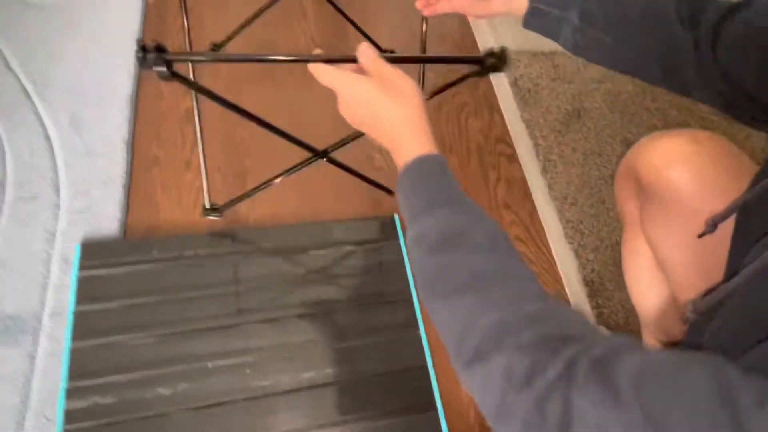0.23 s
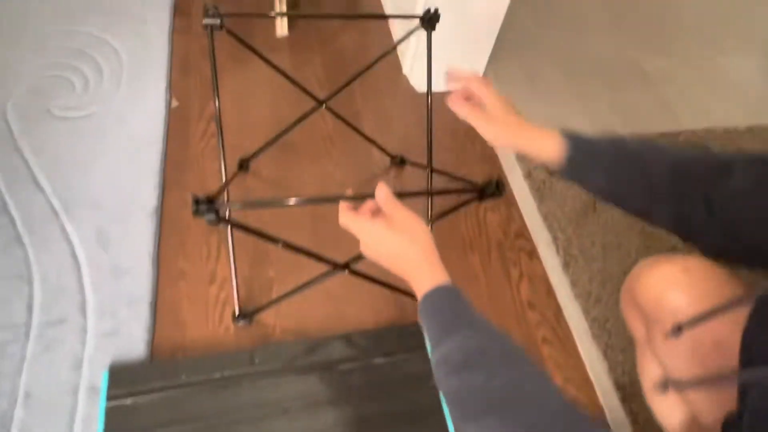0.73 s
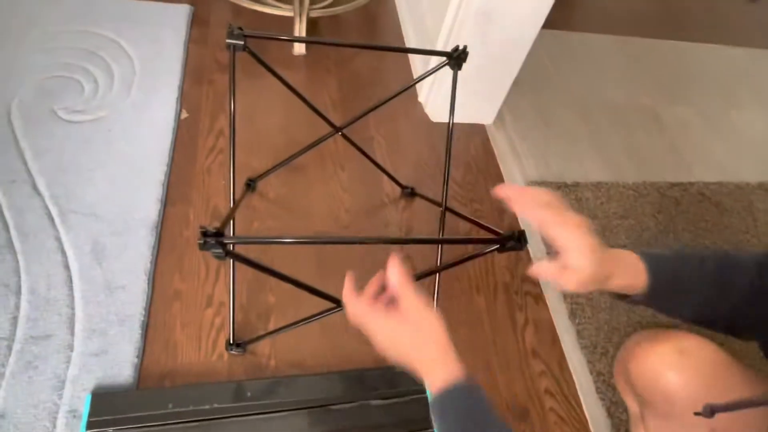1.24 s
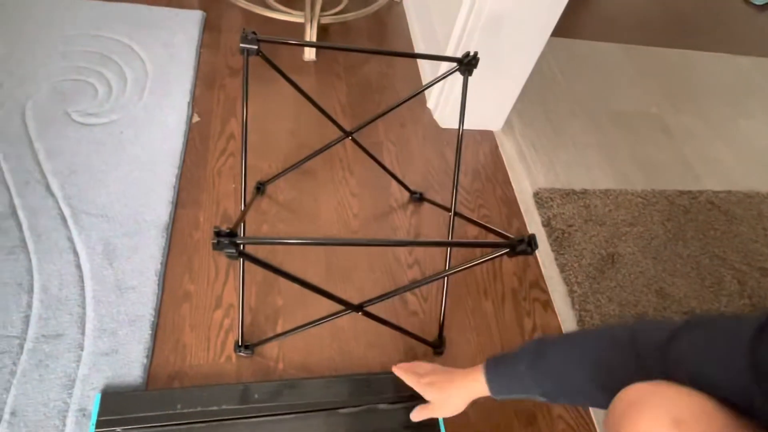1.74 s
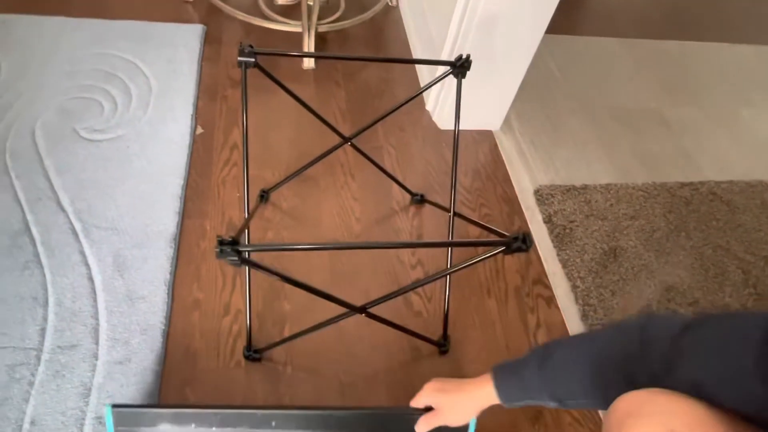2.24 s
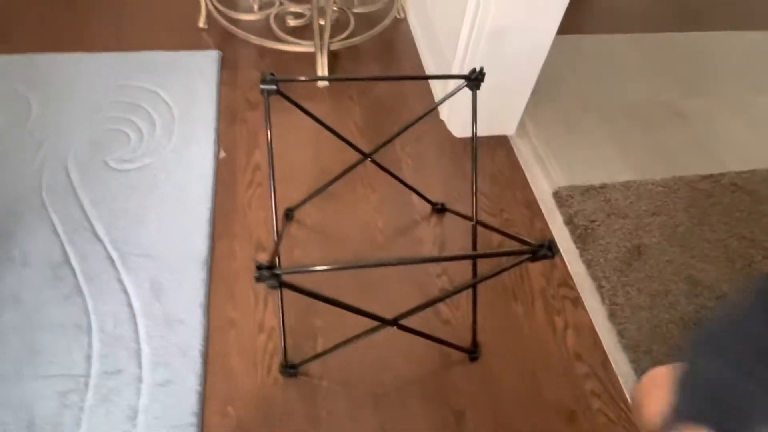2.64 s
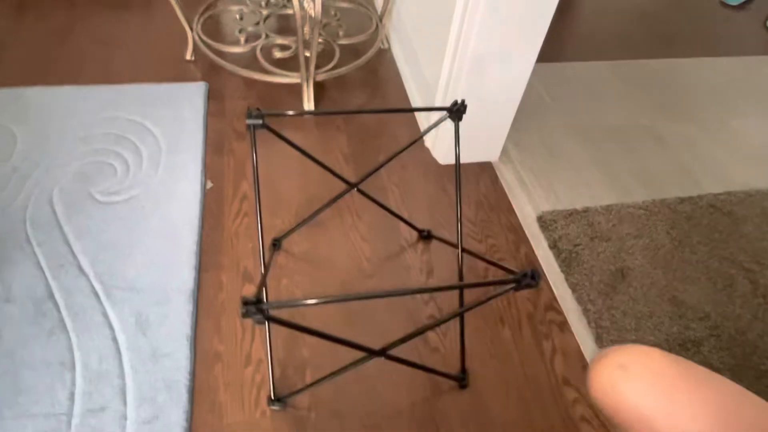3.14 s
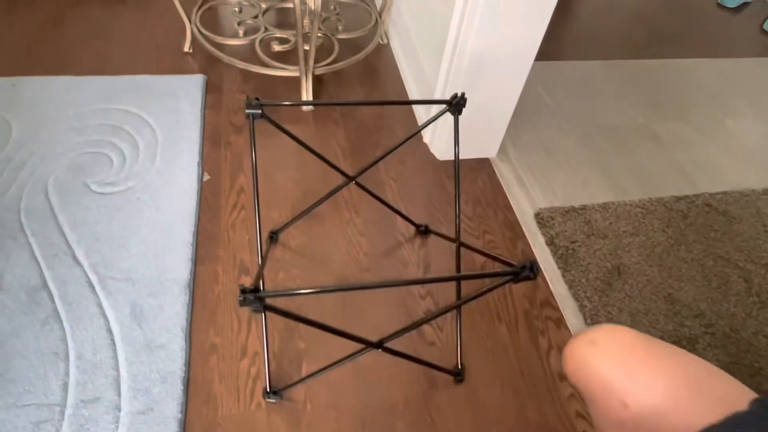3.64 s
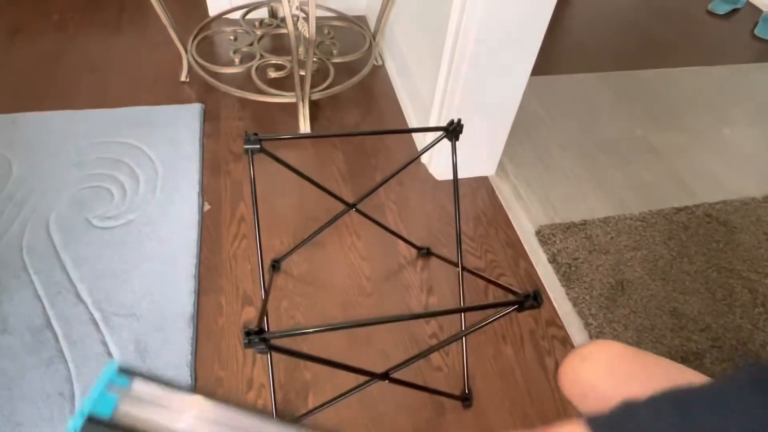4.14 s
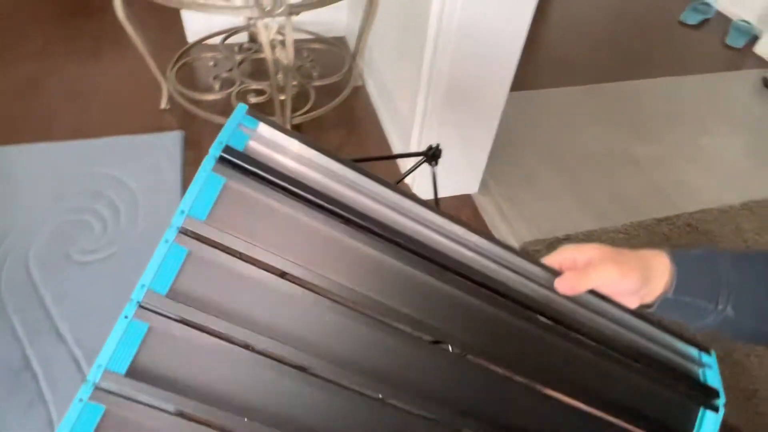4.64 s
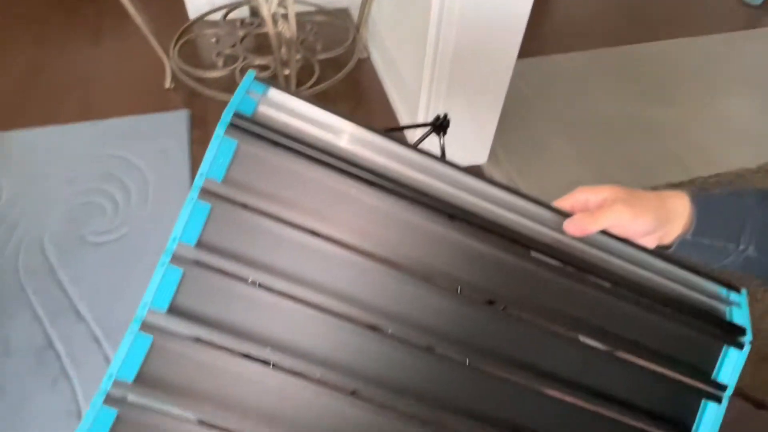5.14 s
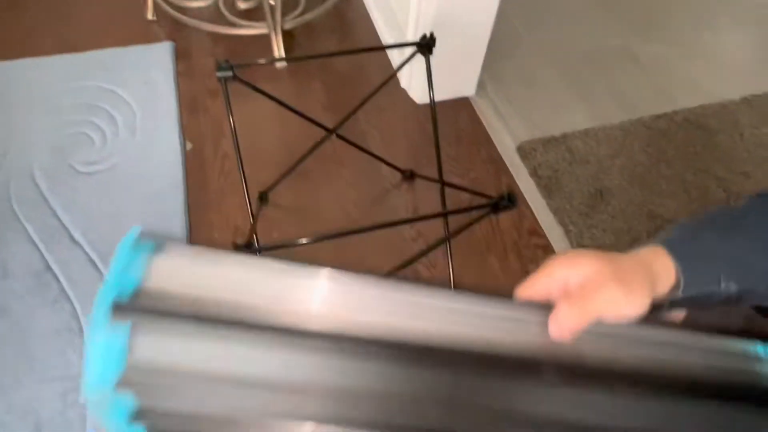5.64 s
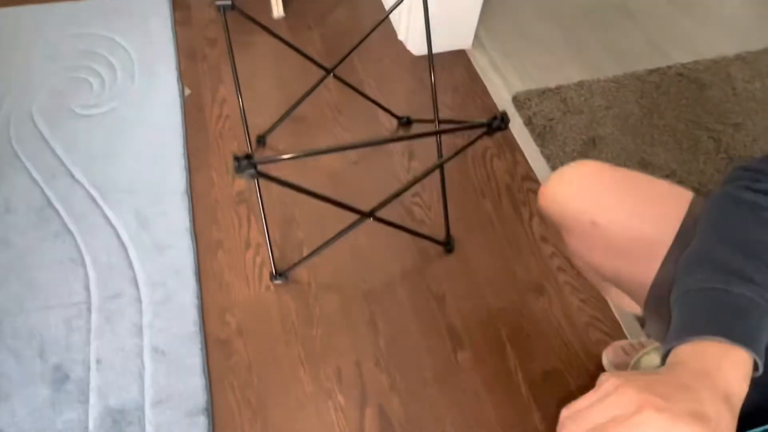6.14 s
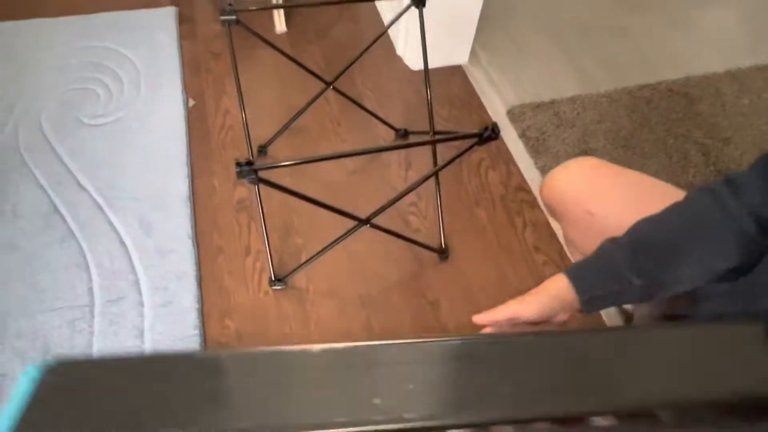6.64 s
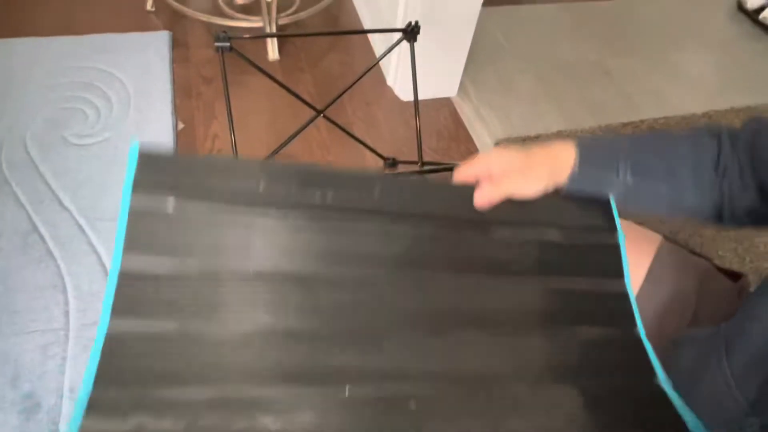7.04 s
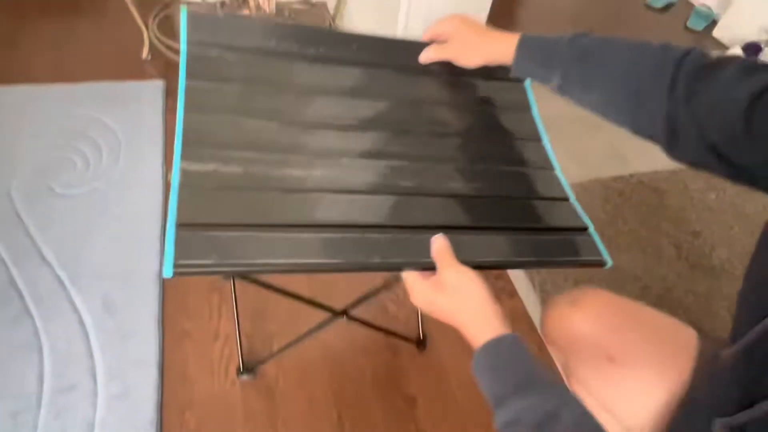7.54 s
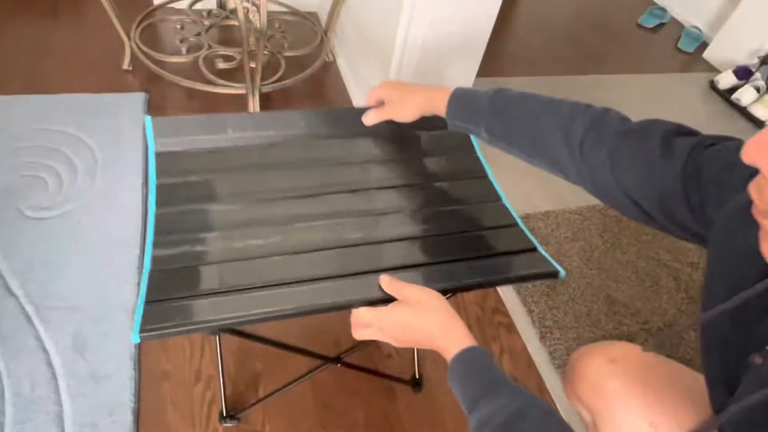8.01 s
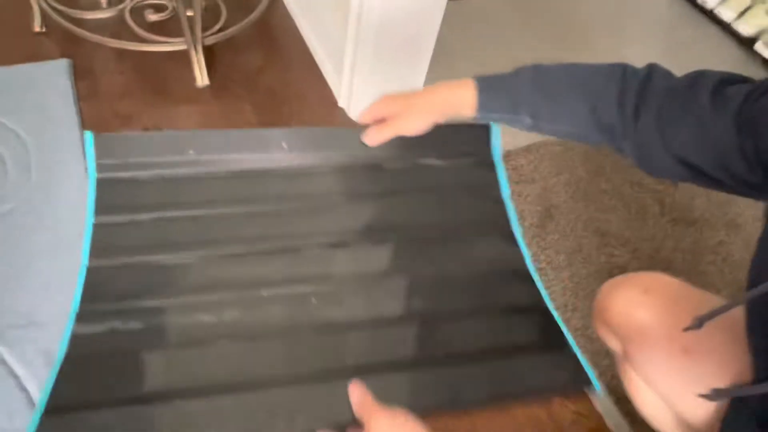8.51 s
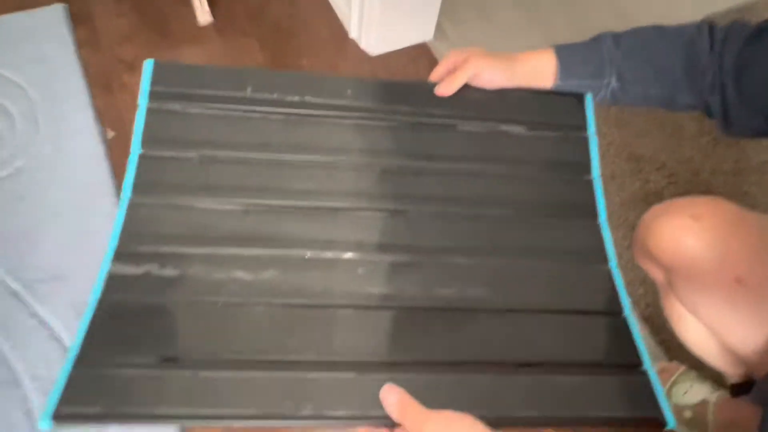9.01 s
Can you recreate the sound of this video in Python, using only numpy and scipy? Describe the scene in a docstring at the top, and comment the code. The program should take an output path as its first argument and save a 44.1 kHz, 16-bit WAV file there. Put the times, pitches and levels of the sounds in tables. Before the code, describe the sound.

In a small hard-floored room, heard close up, a folding metal frame lands with a sharp ringing knock and a few weaker taps. Hollow slats then clatter off the boards, tick and rustle sparsely in the hands with soft floor bumps, rattle more as they are flipped, and finally bang and clack repeatedly against the frame, with low flexing thumps beneath.

```python
"""A thin steel table frame is set down on a wooden floor: each blow is noise bursts plus ringing frame modes.
Then a roll-up top of hollow metal slats is picked up with a clatter, turned over and tried on the frame:
blows and streams of small contacts ring slat modes, filtered noise rustles and ticks, wavering sines sound
as single slat notes, and near the end two very short bright pings make one hard snap. Soft bumps come through
the floor as short low swings. A decaying noise tail gives the small room; room tone runs throughout."""
import sys
import numpy as np
from scipy import signal
from scipy.fft import rfft, irfft, next_fast_len
from scipy.io import wavfile

SR = 44100
rng = np.random.default_rng(int(sys.argv[2]) if len(sys.argv) > 2 else 0)


def store_wav(level_fs):
    """Save 16-bit WAV to argv[1]."""
    pcm = np.round(np.clip(np.atleast_2d(level_fs), -1, 1) * 32767)
    wavfile.write(sys.argv[1], SR, pcm.T.astype(np.int16))


N = 408807
TIME_S = np.arange(N) / SR
SIDES = np.array([[1], [-1]])   # left, right
PICKED_UP_S, LIFTED_S, CLEAR_S = 1.7, 2.04, 2.2   # top touched, off the boards, done clattering off them
SNAP_HZ = 3180   # a hard edge adds a snap and, above it, a tick


def from_db(db):
    """Decibels to gain."""
    return 10 ** (np.asarray(db) / 20)


def pan(left_right_db):
    """Left and right gains from a level difference."""
    return from_db(0.5 * SIDES * left_right_db)


def rms_one(x):
    """Scale to unit power."""
    return x / np.sqrt(np.mean(x ** 2) + 1e-20)


def at_hz(points, hz):
    """Read a table on a log-frequency axis."""
    points = np.array(points)
    return np.interp(np.log(hz), np.log(points[:, 0]), points[:, 1])


def band(x, low_hz, high_hz):
    """Band-pass."""
    return signal.sosfilt(signal.butter(2, [low_hz, high_hz], "band", fs=SR, output="sos"), x)


def drift(rate_hz, s):
    """Slow chance, spread 1, read at times s."""
    steps = rng.standard_normal(int(N / SR * rate_hz) + 3)
    return np.interp(s * rate_hz, np.arange(len(steps)), steps)


# likeness of the two ears: hz, correlation (1)
EAR_LIKENESS = [(60, 0.84), (180, 0.3), (550, 0.066), (1650, 0.059), (4970, 0.017), (15000, 0.13)]


def stereo_noise(spectrum):
    """Noise of a given colour, alike in both ears in the bass, looser above; rms 1."""
    size = next_fast_len(N)
    hz = np.maximum(np.fft.rfftfreq(size, 1 / SR), 1)
    alike = np.clip(at_hz(EAR_LIKENESS, hz), -1, 1)
    mid, side = rfft(rng.standard_normal((2, size)))
    both = np.sqrt(1 + alike) * mid + np.sqrt(1 - alike) * side * SIDES
    return rms_one(irfft(both * from_db(at_hz(spectrum, hz)), size)[:, :N])


# room tone colour: hz, density_db (per Hz, relative)
AIR_SPECTRUM = [(25, 0), (58, -5), (140, -22.5), (177, -11), (250, -28), (300, -25.5), (966, -30),
                (14000, -52)]
AIR_DB = -64


def room_tone():
    """Bass-heavy noise whose level wavers slightly."""
    level_db = AIR_DB + 0.59 * drift(4.9, TIME_S)
    return from_db(level_db) * stereo_noise(AIR_SPECTRUM)


# decay of the room: hz, t60_s
ROOM_DECAY = [(150, 0.34), (600, 0.6), (2000, 0.29), (5000, 0.29), (11000, 0.23)]
ROOM_DB = -9.5


def room(x):
    """Diffuse tail: noise dying at its own rate in each octave; the ears share the long waves."""
    t, edges_hz = np.arange(SR) / SR, 60 * 2. ** np.arange(9)
    noise = rng.standard_normal((3, SR))
    shared, own = noise[0], noise[1:]
    tail = np.zeros((2, SR))
    for low_hz, high_hz in zip(edges_hz, edges_hz[1:]):
        share, apart = 500 / high_hz, high_hz / 500
        octave = band(shared * share + own * apart, low_hz, high_hz) / (share + apart)
        tail += octave * from_db(-60 * t / at_hz(ROOM_DECAY, np.sqrt(low_hz * high_hz)))
    tail *= 1 - np.exp(-t / 0.0056)   # first walls answer after a few ms
    tail /= np.sqrt(np.sum(tail ** 2, axis=1, keepdims=True))
    return signal.fftconvolve(x, tail, axes=1)[:, :N]


# soft bumps of hands and knees through the floor: start_s, level_db, pitch_hz
FLOOR_BUMPS = [(0.578, -42.5, 64), (0.932, -42, 91.6), (3.1, -53, 47.2), (3.501, -38, 83.7),
               (3.617, -47.5, 69.4), (3.983, -45.5, 84.2), (3.996, -33.5, 190), (5.887, -48, 109),
               (6.865, -28.5, 170.3), (6.955, -32.5, 164), (6.997, -42, 66), (7.012, -39, 203),
               (7.202, -48, 127), (8.001, -54, 133), (8.852, -36, 130), (9.031, -33, 124)]


def bumps():
    """A soft push sets the floor boards swinging for a few cycles."""
    t, out = np.arange(SR // 2) / SR, np.zeros(N)
    for start_s, level_db, pitch_hz in FLOOR_BUMPS:
        shape = from_db(level_db - 60 * t / 0.13) * (1 - np.exp(-t / 0.0032))
        swing = shape * np.sin(2 * np.pi * pitch_hz * t)
        at = round(start_s * SR)
        out[at:at + len(t)] += swing[:N - at]
    return out


# moves of the hands: reached_s (full motion), held_s, rattle_db, rattle_hz, rub_db, flex_db
# (levels relative, before each source's gain)
HAND_MOVES = [(0.02, 0.23, -82, 1050, -83.5, -74.5), (0.568, 0.018, -42, 1877, -59, -63),
              (1.09, 0.2, -76, 985, -89, -62), (1.408, 0.019, -81, 970, -78, -70.5),
              (1.74, 0.17, -56.5, 1020, -73, -68), (1.929, 0.095, -32, 956, -56, -63),
              (2.299, 0.29, -59, 1106, -67, -67.5), (2.71, 0.017, -58, 1740, -69, -96.5),
              (2.8, 0.021, -66.5, 1490, -75, -55), (2.93, 0.023, -60, 1500, -62, -57),
              (3.07, 0.0053, -67.5, 1500, -68.5, -55.5), (3.289, 0.0092, -62, 1500, -68, -58.5),
              (3.359, 0.01, -55.5, 2160, -59, -77.5), (3.621, 0.096, -71.5, 1710, -71.5, -72.5),
              (4.007, 0.029, -60, 1580, -61, -59.5), (4.16, 0.13, -67, 1580, -72.5, -65.5),
              (4.528, 0.023, -71, 2300, -69.5, -84), (5.28, 0.17, -85, 1554, -72.5, -78.5),
              (5.561, 0.021, -66, 800, -73, -64.5), (5.66, 0.11, -73.5, 1550, -75.5, -67),
              (5.862, 0.13, -57.5, 1500, -63.5, -55.5), (6.04, 0.18, -55, 1500, -64, -76),
              (6.299, 0.034, -56.5, 1450, -68.5, -62), (6.459, 0.0087, -63, 1480, -71.5, -87.5),
              (6.662, 0.2, -63.5, 1480, -72, -91), (6.86, 0.044, -50, 1400, -61, -59),
              (6.98, 0.16, -54.5, 1480, -61.5, -60), (7.25, 0.21, -62, 1540, -75.5, -62),
              (7.498, 0.13, -73, 1550, -78.5, -69), (7.8, 0.12, -51, 1790, -65.5, -49.5),
              (7.99, 0.077, -40.5, 1610, -56, -41.5), (8.2, 0.12, -54, 1360, -80, -50),
              (8.289, .03, -44.5, 1390, -71.5, -45), (8.361, 0.17, -37, 620, -63, -44.5),
              (8.68, 0.21, -51.5, 1190, -67.5, -44.5), (8.94, 0.13, -54.5, 1280, -73, -47.5),
              (9.102, 0.1, -52.5, 1210, -91.5, -70)]
RISE_DB_PER_S, FALL_DB_PER_S = 323, 116.5   # brisk start, slower end
REST_DB = -102   # hands at rest


def moves():
    """Each move rises, holds and falls; powers add. Gives rattle dB, rattle Hz, rub dB, flex dB in time."""
    reached_s, held_s, rattle_db, rattle_hz, rub_db, flex_db = np.transpose(HAND_MOVES)[:, :, None]
    t = np.linspace(0, N / SR, 2000)
    rise_db = -RISE_DB_PER_S * np.maximum(reached_s - t, 0)
    fall_db = -FALL_DB_PER_S * np.maximum(t - reached_s - held_s, 0)
    powers = [from_db(rise_db + fall_db + level_db) ** 2 for level_db in (rattle_db, rub_db, flex_db)]
    levels_db = [10 * np.log10(p.sum(axis=0) + from_db(REST_DB) ** 2) for p in powers]
    pitch_hz = (powers[0] * rattle_hz).sum(axis=0) / powers[0].sum(axis=0)
    curves = (levels_db[0], pitch_hz, levels_db[1], levels_db[2])
    return [np.interp(TIME_S, t, curve) for curve in curves]


def contacts(per_s, spread_db):
    """Random contacts of uneven size: sample numbers and sizes, unit power."""
    at = np.flatnonzero(rng.random(N) < per_s / SR)
    size_db = spread_db * np.minimum(rng.exponential(1, N), 4)[at]
    sizes = from_db(size_db) * rng.choice([-1, 1], N)[at]
    return at, rms_one(sizes) * np.sqrt(SR / per_s)


def near_db(hz, centre_hz, db_per_octave):
    """A contact drives modes near its own pitch best."""
    return -db_per_octave * np.abs(np.log2(hz / centre_hz))


def ring(clicks, hz, t60_s):
    """A unit click sets a sine of height 1 ringing."""
    r = from_db(-60 / (np.clip(t60_s, .01, 1.5) * SR))
    w = 2 * np.pi * hz / SR
    return signal.lfilter([0, np.sin(w)], [1, -2 * r * np.cos(w), r * r], clicks + 1e-18)


def shaken(at, sizes, modes, damping, centre_hz, wander_db, db_per_octave=7.5):
    """Small contacts ring a body that hands damp; as the grip shifts, modes come and go."""
    out, drive = np.zeros((2, N)), np.zeros(N)
    for k, (hz, level_db, t60_s) in enumerate(modes):
        mode_db = level_db + near_db(hz, centre_hz, db_per_octave) + wander_db * drift(13.0, at / SR)
        drive[at] = sizes * from_db(mode_db)
        damped_s = damping * t60_s
        part = ring(drive, hz, damped_s) / np.sqrt(damped_s * SR) * (-1) ** k
        out[0] += part
        out[1] += np.roll(part, rng.integers(-8, 9))   # slats lie at different angles to the two ears
    return out


# bending modes of the slats, close groups since no two are alike:
# pitch_hz, level_db (relative), t60_s (before damping)
SLAT_BENDING = [(760, 0.5, 0.04), (1100, -3, 0.018), (1260, -20, 0.13), (1350, -6, 0.078),
                (1460, -0.5, 0.27), (1515, 1.5, 0.18), (1526, -0.5, 0.22), (1711, -2.5, 0.25),
                (1731, -12.5, 0.24), (2055, -14, .15), (2370, -22, 0.043), (2553, -2, 0.22),
                (2690, -5, 0.33), (2750, -18.5, 0.6), (3160, -16.5, 0.1), (3270, -34, 0.12),
                (3510, -21, 0.2), (4190, -9, 0.29), (4540, -13, 0.13), (5240, -13.5, .15),
                (7050, -23, 0.24)]
# rustle colour: hz, density_db (per Hz, relative)
RUSTLE_SPECTRUM = [(180, -31.5), (300, -7.5), (496, -3.5), (574, -5), (1150, -14), (1470, -4.5),
                   (1940, -10.5), (2510, -5), (9820, -9.5), (12500, -14), (14500, -42)]
RUSTLE_PATCHY_DB = 1.6


def rubbing(rub_db):
    """Slats and sleeves rub: patchy rustle, stray ticks, and the slats sing faintly."""
    rustle = stereo_noise(RUSTLE_SPECTRUM)
    edges_hz, together = np.geomspace(150, 15000, 9), drift(30.0, TIME_S)
    out = np.zeros((2, N))
    for k, (low_hz, high_hz) in enumerate(zip(edges_hz, edges_hz[1:])):
        level_db = rub_db + 5.0 + 2.6 * together + RUSTLE_PATCHY_DB * drift(23.0, TIME_S)
        out += from_db(level_db) * band(rustle, low_hz, high_hz) * (-1) ** k
    at, sizes = contacts(per_s=220.0, spread_db=-1.5)
    touched = sizes * (at > PICKED_UP_S * SR) * from_db(rub_db[at] + 8.5)
    out += shaken(at, touched, SLAT_BENDING[5::2], damping=.7, centre_hz=3040, wander_db=7.0)
    ticks = np.zeros(N)
    ticks[at] = sizes * from_db(rub_db[at] - 5.5)
    return out + band(ticks, 2500, 15000)


# modes of the whole top: pitch_hz, level_db (relative), t60_s (before damping)
TOP_FLEXING = [(106, -8, 0.11), (146, -4, 0.04), (192, -5, 0.11), (238, -4.5, 0.12), (285, -5.5, 0.19),
               (414, 0, 0.027)]


def flexing(flex_db):
    """Handling flexes the whole top: contacts ring its low modes."""
    at, sizes = contacts(per_s=980.0, spread_db=2.5)
    sizes = sizes * from_db(flex_db[at] + 2.1 * drift(25.0, at / SR))
    return from_db(12.0) * shaken(at, sizes, TOP_FLEXING, damping=0.51, centre_hz=190, wander_db=3.5)


def rattling(rattle_db, rattle_hz):
    """Loose slats rattle: contacts ring the slats, once touched, over a dull body of each contact."""
    at, sizes = contacts(per_s=2200.0, spread_db=2.5)
    sizes = sizes * from_db(rattle_db[at] + 2.1 * drift(40.0, at / SR))
    centre_hz = rattle_hz[at]
    touched = at > PICKED_UP_S * SR
    out = from_db(3.5) * shaken(at, sizes * touched, SLAT_BENDING, damping=0.19, centre_hz=centre_hz,
                                wander_db=5.5, db_per_octave=9.0)
    body = [(hz, -8 * max(np.log2(hz / 2400), 0), 8 / hz) for hz in np.geomspace(260, 4600, 22)]
    # contacts sound broad, except while the top clatters off the boards
    db_per_octave = np.where(touched & (at < CLEAR_S * SR), 10.5, 5.5)
    out += from_db(5.0) * shaken(at, sizes, body, damping=0.99, centre_hz=centre_hz,
                                 wander_db=3.0, db_per_octave=db_per_octave)
    return out


# lone ticks of joints and end caps: start_s, level_db, left_right_db
JOINT_TICKS = [(0.441, -45, 0), (0.9112, -47.5, 5), (1.1807, -58, -4), (1.1978, -46.5, -4),
               (1.413, -55.5, -8.5), (1.9867, -38, -3), (2.408, -47, -4), (3.2946, -49.5, -2),
               (3.4182, -36, 3), (3.7284, -54.5, 4.5), (4.5333, -41.5, 1), (6.8567, -38, -6),
               (8.7939, -49, 1)]
LONE_TICK_HZ, LONE_TICK_T60_S = (4800, 13000), 0.0087


def lone_ticks():
    """A tick is a few milliseconds of bright noise."""
    t, out = np.arange(2000) / SR, np.zeros((2, N + 2000))
    for start_s, level_db, left_right_db in JOINT_TICKS:
        noise = rng.standard_normal((3, len(t)))
        bright = rms_one(band(noise[0] + 0.54 * noise[1:], *LONE_TICK_HZ))
        at = round(start_s * SR)
        out[:, at:at + len(t)] += bright * pan(left_right_db) * from_db(level_db - 60 * t / LONE_TICK_T60_S)
    return out[:, :N]


# single slat notes, and at 9.04 s two very short bright pings that make one hard snap:
# start_s, level_db, pitch_hz, t60_s, left_right_db
NOTES_AND_PINGS = [(2.099, -59, 496, 0.92, 7), (2.447, -75, 2500, 0.81, 0), (2.702, -51, 1506, 0.14, 4),
                   (2.704, -55, 1800, 0.14, 0), (2.915, -54, 486, 0.57, -6), (2.92, -52.5, 1406, 0.35, 0),
                   (2.95, -48, 4500, 0.1, 5), (2.995, -45, 1417, 0.14, 4), (3.34, -57, 1527, 0.66, 0),
                   (4.024, -44, 1530, 0.11, 2), (4.028, -57, 2503, 0.27, -6), (4.225, -63.5, 497, 0.88, -6),
                   (4.291, -61, 1496, 0.3, 2), (4.41, -62, 1440, 0.14, 3), (4.557, -68, 2560, 0.56, -3),
                   (5.609, -47.5, 1500, 0.24, -1), (5.845, -38.5, 453, 0.2, -6),
                   (5.86, -38.5, 477.5, 0.73, 4), (5.86, -38, 1416, 0.16, -3), (5.9, -48, 1456, 0.36, 7),
                   (6.077, -46, 506, 0.22, -3), (6.225, -47.5, 1475, 0.13, 3),
                   (6.331, -47, 1506, 0.11, -10), (6.659, -49, 1462, 0.24, -1.5),
                   (6.775, -41.5, 486, 0.8, -7), (6.936, -39.5, 1460, 0.15, 6), (6.995, -55, 2830, 0.67, 0),
                   (7.053, -44, 1458, 0.079, 3), (7.077, -40, 1412, 0.086, 3), (7.1, -45, 1455, 0.15, 0),
                   (7.21, -39.5, 404, 0.21, 3), (7.22, -55, 513, 0.29, -11), (7.344, -48.5, 1710, 0.22, 1),
                   (8.014, -41, 490, 0.42, 5), (8.309, -43, 1555, 0.29, 4), (8.359, -39, 390, 0.32, 4),
                   (8.747, -35, 1590, 0.09, 0), (9.046, -30.5, 1545, 0.16, 8), (9.039, -21, 4200, 0.016, 4),
                   (9.0395, -21, 4600, 0.016, 4), (2.057, -31, 1454, 0.086, 3), (2.097, -38, 1526, 0.24, 1)]
NOTE_RISE_S = 0.0015
WAVER_DB, WAVER_CYCLES = 2.5, 22   # depth at 500 Hz, cycles per step


def notes_and_pings():
    """Each is a sine with a fast rise, a decay of its own and an uneven level, more uneven when higher."""
    t, out = np.arange(SR // 2) / SR, np.zeros((2, N + SR))
    chances = rng.standard_normal((len(NOTES_AND_PINGS), 128))
    for (start_s, level_db, pitch_hz, t60_s, left_right_db), chance in zip(NOTES_AND_PINGS, chances):
        # loose neighbours break up the tone
        steps = np.interp(t * pitch_hz / WAVER_CYCLES, np.arange(127), chance[1:])
        waver_db = WAVER_DB * np.sqrt(pitch_hz / 500) * steps
        shape = from_db(level_db + waver_db - 60 * t / np.clip(t60_s, .012, 1))
        shape *= (1 - np.exp(-t / NOTE_RISE_S)) * (1 - (t / t[-1]) ** 4)
        ear_t = t + 0.5 * SIDES * .0001 * chance[0]
        at = round(start_s * SR)
        out[:, at:at + len(t)] += shape * pan(left_right_db) * np.sin(2 * np.pi * pitch_hz * ear_t)
    return out[:, :N]


# clack, thud, snap, tick: share of the burst t60 (1), lows last longer
BURST_SHARE = [1.073, 1.81, 0.7, 0.68]
# clack, thud, snap, tick: part that differs between the ears (1)
BURST_LOOSENESS = [0.45, 0.34, 0.91, 0.22]
THUD_HZ, TICK_HZ = (105, 346), (7800, 13700)
SOFT_RISE_S, SOFT_BELOW_DB = 0.0069, -49   # weak blows are soft contacts that build more slowly


def bursts(hits):
    """Each blow is a sharp crack and a dying burst of noise: clack, thud, snap and tick."""
    size = 2 ** 13
    t, hz = np.arange(size) / SR, np.fft.rfftfreq(size, 1 / SR) + 1
    out = np.zeros((2, N + size))
    for start_s, clack_db, clack_hz, t60_s, thud_db, edge_db, _, tick_db, left_right_db in hits:
        edges_hz = [(clack_hz / 3.3, clack_hz * 1.7), THUD_HZ, (SNAP_HZ / 2.1, SNAP_HZ * 2.11), TICK_HZ]
        levels_db = clack_db + np.array([0, thud_db, edge_db, edge_db + tick_db])
        white = rfft(rng.standard_normal((4, 3, size)))
        lag = np.exp(2j * np.pi * hz * rng.normal(0, .00008) * SIDES)   # one ear hears it first
        soft_s = SOFT_RISE_S / (1 + from_db(clack_db - SOFT_BELOW_DB))
        at = round(start_s * SR)
        parts = zip(edges_hz, levels_db, BURST_SHARE, BURST_LOOSENESS, white)
        for (low_hz, high_hz), level_db, share, loose, w in parts:
            rise_s = 0.00033 + soft_s + 3.2 / np.sqrt(low_hz * high_hz)   # lows take longer to build
            rise = 1 - np.exp(-t / rise_s)
            burst = from_db(-60 * t / (share * np.clip(t60_s, .01, .15)))
            crack = 2.0 * from_db(-60 * t / (0.0084 * share))
            colour = 1 / (1 + (low_hz / hz) ** 3) / (1 + (hz / high_hz) ** 4)
            noise = rms_one(irfft((w[0] * lag + loose * w[1:]) * colour))
            out[:, at:at + size] += noise * rise * (burst + crack) * from_db(level_db) * pan(left_right_db)
    return out[:, :N]


def clack_and_snap(hits, snap_gain_db):
    """The clack drives the lower modes, the snap the upper ones."""
    ring_db = hits[:, 1] + hits[:, 6]
    snap_db = ring_db + hits[:, 5] + snap_gain_db
    return [(ring_db, hits[:, 2]), (snap_db, np.full(len(hits), SNAP_HZ))]


def struck(hits, contact, modes, scatter_db, damping, db_per_octave, unlike, size):
    """Each blow meets a bar or slat tuned a little apart; strength, side and phase vary by mode.

    contact lists the parts of the blow as (level_db, pitch_hz)."""
    hz, mode_db, t60_s = np.transpose(modes)
    t, out = np.arange(size) / SR, np.zeros((2, N + size))
    fade = 1 - (t / t[-1]) ** 4
    chances = rng.standard_normal((len(hits), 4, len(modes)))
    for k, (hit, chance) in enumerate(zip(hits, chances)):
        reach = sum(from_db(level_db[k] + near_db(hz, pitch_hz[k], db_per_octave))
                    for level_db, pitch_hz in contact)
        side = pan(hit[-1] + 9.2 * chance[1] * np.minimum(hz / 700, 1))
        lag = np.exp(2j * np.pi * hz * .00005 * chance[2] * SIDES)
        strength = reach * from_db(mode_db + scatter_db * chance[0])
        start = strength * side * lag * (-1) ** np.arange(len(hz))
        rate = 2j * np.pi * hz * (1 + unlike * chance[3]) - np.log(1000) / (damping * t60_s)
        at = round(hit[0] * SR)
        out[:, at:at + size] += (start @ np.exp(np.outer(rate, t))).imag * fade
    return out[:, :N]


# frame feet on the floor: start_s, clack_db, clack_hz, burst_t60_s (before band share and limits),
# thud_db, edge_db, ring_db (last three relative to clack)
FRAME_BLOWS = [(0.412, -32.5, 1130, 0.2, -11.5, -7, -13), (0.487, -35.5, 1190, 0.15, -6.5, -7, -10.5),
               (0.54, -20, 1502, 0.088, -11.5, 1, -12.5), (0.91, -46, 907, 0.17, 3, -1.5, -20),
               (0.921, -38.5, 1104, 0.26, -4.5, -11.5, -25.5), (1.092, -51, 892, 0.064, 13.5, -9, -19),
               (1.181, -52, 1130, 0.11, 1.5, -7, -30), (1.197, -44.5, 1405, 0.082, -0.5, -24, -12)]
# frame modes: pitch_hz, level_db (relative), t60_s (before damping)
FRAME_RINGING = [(443, 5, 0.2), (880, 6, 0.13), (947, 6, 0.35), (1033, 6.5, .2), (1460, 6, 0.096),
                 (1630, -9.5, 0.34), (1990, 3.5, 0.11), (2700, -11.5, 0.17), (3530, -10.5, 0.12),
                 (4260, -7.5, 0.33), (5400, -9.5, 0.14)]
FRAME_TICK_DB, FRAME_PAN_DB = -3.5, 0.5   # tick against snap, left against right


def frame_blows():
    """Steel feet knock on wood: noise bursts, and the frame's modes ring."""
    hits = np.array([(*hit, FRAME_TICK_DB, FRAME_PAN_DB) for hit in FRAME_BLOWS])
    return bursts(hits) + struck(hits, clack_and_snap(hits, snap_gain_db=-0.5), FRAME_RINGING, scatter_db=2.0,
                                 damping=0.45, db_per_octave=8.5, unlike=0.0071, size=9000)


# slats knocking: start_s, clack_db, clack_hz, burst_t60_s (before band share and limits),
# thud_db, edge_db, ring_db (last three relative to clack)
SLAT_BLOWS = [(1.745, -34.5, 980, 0.087, -5, -16.5, -15), (1.799, -35, 1280, 0.11, -29, -11, 6.5),
              (1.82, -37, 1080, 0.18, -19, -40, 4.5), (1.908, -36, 855, 0.17, -19, -28, 5.5),
              (1.933, -27, 854, 0.17, -30, -35, 4), (1.95, -14.5, 1290, 0.11, -37, -17.5, -9.5),
              (1.986, -28.5, 776, 0.064, -34, -6, -23), (2.008, -26.5, 1110, 0.055, -17, -33, -2.5),
              (2.022, -25, 800, 0.055, -21, -33, -3.5), (2.053, -25.5, 1400, 0.059, -18.5, -6.5, -2.5),
              (2.07, -26, 1260, 0.058, -17, -22, -6), (2.103, -29, 1530, 0.19, -17, 2, -14),
              (2.198, -41, 1610, 0.035, -40, 7, -9.5), (2.569, -42.5, 1700, 0.036, -19, -6, -22),
              (2.729, -62, 2500, 0.07, -20, 3, -3), (2.912, -44, 1370, 0.079, 2, 1.5, -7.5),
              (3.431, -50.5, 1590, 0.083, -21, 16, -7), (3.442, -45, 2620, 0.089, -11.5, 16, -4),
              (3.982, -45, 1570, 0.17, 3.5, 2, -5), (4.405, -58.5, 1455, 0.24, -14, 1.5, -11),
              (4.534, -42, 888, 0.033, -24.5, -23.5, -1), (5.601, -47.5, 1430, 0.13, -14, 9.5, -5),
              (5.845, -52, 1400, 0.18, 6, 7, -10), (5.899, -45, 1430, 0.086, 8, 8, -11),
              (6.05, -49.5, 2350, 0.18, -18, -5, -1), (6.073, -41.5, 1470, 0.12, -2, 1, -6),
              (6.298, -45.5, 2540, 0.18, -2.5, 0.5, -1), (6.695, -53, 1510, 0.22, -2, 3, -4),
              (6.723, -38.5, 1330, 0.055, -9, -32, 1), (6.77, -26, 1480, 0.19, -13, -16.5, 0),
              (6.854, -34, 1540, 0.14, -8, -10, -10), (6.94, -37.5, 1410, 0.1, -3, -7.5, -13),
              (7.001, -36.5, 1385, 0.077, 3.5, -13, -1), (7.197, -39.5, 2170, 0.16, -4.5, -3, -0.5),
              (7.766, -42, 1437, 0.18, -21, -5, 0), (7.778, -14.5, 1860, 0.049, -13.5, -22, -3),
              (7.863, -25, 1570, 0.071, -7.5, -14.5, -3), (7.974, -21, 1790, 0.064, -19, -0.5, -9),
              (8.015, -20, 1540, 0.12, -4, -4, -8.5), (8.061, -23, 1600, 0.069, -39, -2.5, -6),
              (8.151, -36.5, 1470, 0.07, 0, -28, -4), (8.376, -34.5, 2030, 0.098, -3, -8, -14),
              (8.385, -30, 2020, 0.034, -22, -5, -11), (8.586, -30, 2180, 0.1, -1.5, -6, -2),
              (8.682, -25.5, 2330, 0.074, -3.5, -18, -5.5), (8.746, -33, 1570, 0.17, -8, -14, -11),
              (8.797, -44, 1010, 0.065, 2, -15, -20), (8.853, -30, 1500, 0.16, -5.5, -3, -6),
              (8.92, -34.5, 606, 0.086, -11, -16, 4.5), (9.039, -18, 2100, 0.065, -11.5, -22.5, -13),
              (9.125, -36.5, 705, 0.032, -25, -22, 3), (9.156, -29.5, 1520, 0.069, -5, -20, -19),
              (9.2, -30, 920, 0.051, -2.5, -1, -24)]
# the top lying on the boards: pitch_hz, level_db (relative), t60_s (before damping)
LYING_RINGING = [(430, -20, 0.12), (786, 1, 0.14), (984, -2, 0.41), (1080, -3, 0.1), (1130, -7.5, 0.3),
                 (1311, -2.5, 0.18), (1497, -7, 0.053), (1694, -4.5, 0.11), (2070, -14, 0.076),
                 (2300, -13.5, 0.1), (2740, -4.5, 0.13)]
SLAT_TICK_DB, SLAT_PAN_DB = -6.5, -0.66   # tick against snap, left against right


def slat_blows():
    """Slats knock: noise bursts, slat modes (others while the top lies), and thuds flexing the top."""
    hits = np.array([(*hit, SLAT_TICK_DB, SLAT_PAN_DB) for hit in SLAT_BLOWS])
    lying, held = hits[hits[:, 0] < LIFTED_S], hits[hits[:, 0] > LIFTED_S]
    out = bursts(hits)
    out += struck(lying, clack_and_snap(lying, snap_gain_db=-0.8), LYING_RINGING, scatter_db=4.0,
                  damping=0.64, db_per_octave=16.5, unlike=0.0011, size=5000)
    out += struck(held, clack_and_snap(held, snap_gain_db=6.0), SLAT_BENDING, scatter_db=3.5,
                  damping=0.27, db_per_octave=19.0, unlike=0.02, size=5000)
    thud = [(hits[:, 1] + hits[:, 4] + 0.64, np.full(len(hits), 180))]
    out += struck(hits, thud, TOP_FLEXING, scatter_db=6.5,
                  damping=0.58, db_per_octave=15.5, unlike=0.056, size=7000)
    return out


def scene():
    """Blows and handling in the room, over the wavering room tone."""
    rattle_db, rattle_hz, rub_db, flex_db = moves()
    near = bumps() + rubbing(rub_db) + flexing(flex_db) + rattling(rattle_db, rattle_hz)
    near += lone_ticks() + notes_and_pings() + frame_blows() + slat_blows()
    return near + from_db(ROOM_DB) * room(near) + room_tone()


# left against right: hz, left_right_db
LEFT_RIGHT_COLOUR = [(60, 3), (250, 2.5), (700, 3), (1500, -1), (4000, 4.5), (9000, -0.5)]
CUTOFF_HZ = 16600


def record(dry):
    """Left and right differ in colour; the deepest bass drops, the top octave fades and is cut."""
    size = next_fast_len(N)
    balance_db = at_hz(LEFT_RIGHT_COLOUR, np.fft.rfftfreq(size, 1 / SR) + 1)
    dry = irfft(rfft(dry, size) * pan(balance_db), size)[:, :N]
    dry = signal.sosfilt(signal.butter(4, 42, "high", fs=SR, output="sos"), dry)
    dry = signal.sosfilt(signal.butter(11, 13400, fs=SR, output="sos"), dry)
    return signal.sosfilt(signal.cheby2(12, 70, CUTOFF_HZ, fs=SR, output="sos"), dry)


dry = scene()
out = record(dry)
store_wav(out)
```